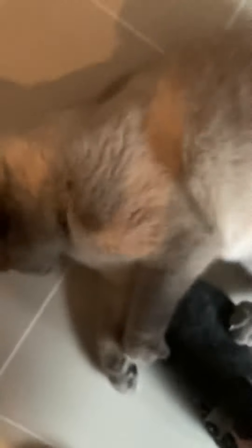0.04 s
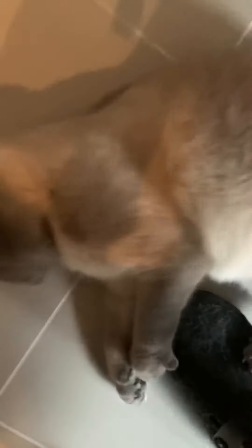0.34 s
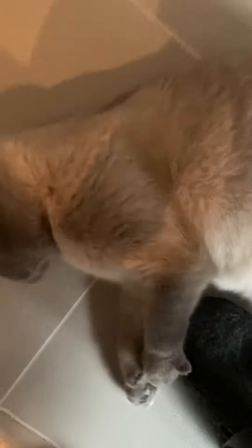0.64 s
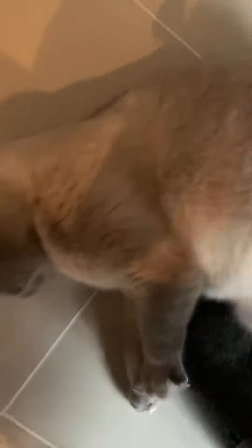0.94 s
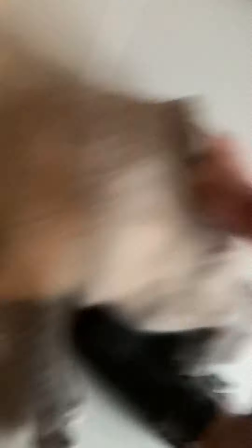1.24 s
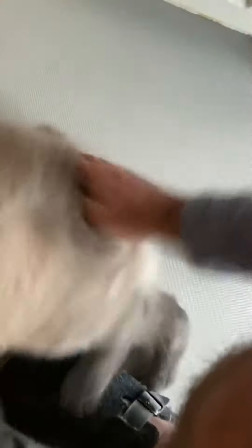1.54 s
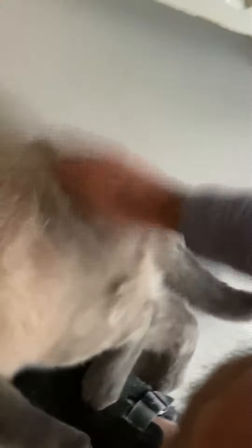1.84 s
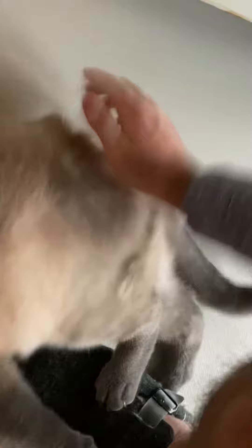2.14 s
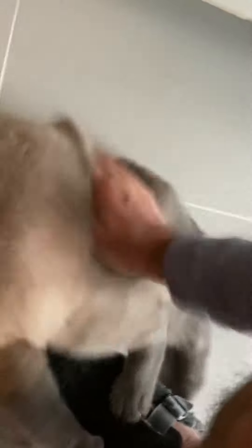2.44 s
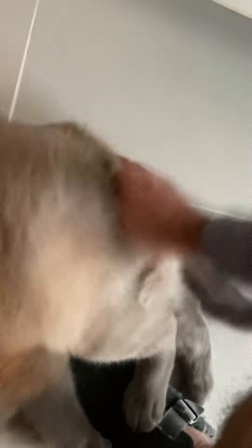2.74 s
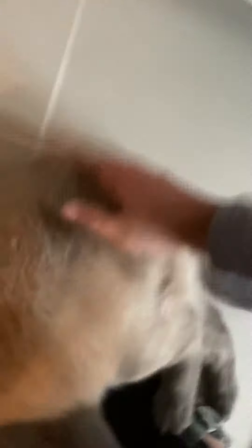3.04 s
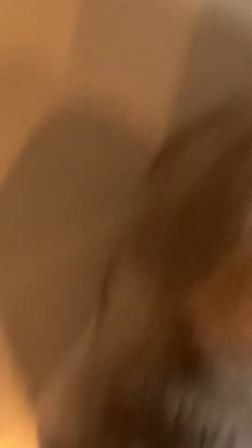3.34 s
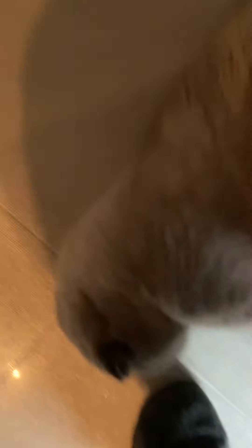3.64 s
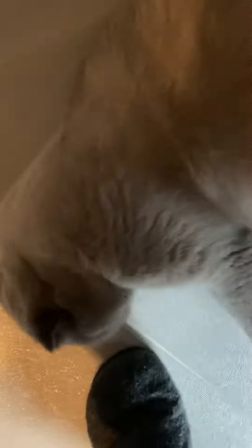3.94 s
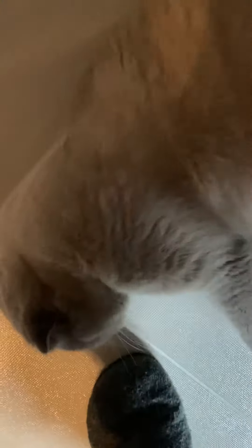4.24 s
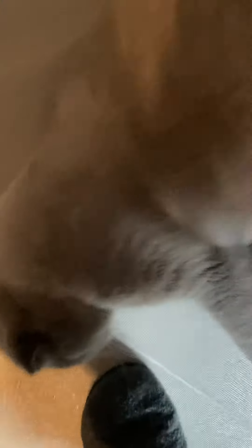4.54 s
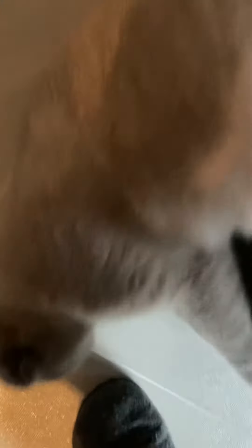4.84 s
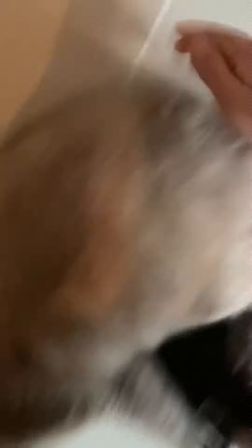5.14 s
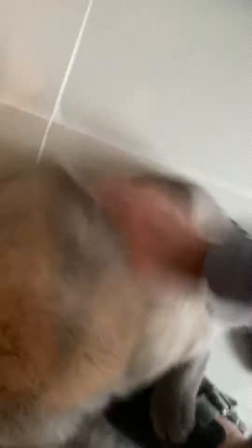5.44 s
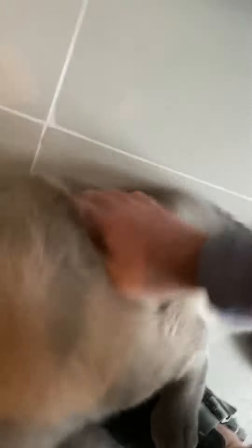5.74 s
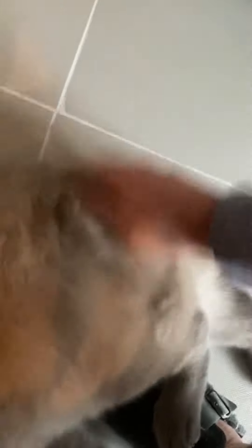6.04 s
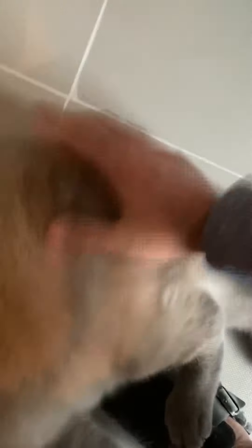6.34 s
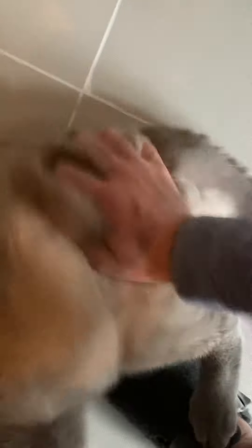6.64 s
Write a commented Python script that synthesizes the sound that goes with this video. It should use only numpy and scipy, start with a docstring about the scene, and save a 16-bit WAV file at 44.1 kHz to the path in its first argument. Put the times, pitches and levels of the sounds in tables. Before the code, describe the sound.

A hand pats a cat in two runs of soft, quick thumps, with fur rustling and a short low grumble between.

```python
"""Patting a cat on a tiled floor

A hand pats a cat's rump close by, about four times a second in two runs. Each pat brushes the fur,
claps the air out from under the palm and thumps the body; the bare room answers. Fur and sleeve
rustle in between, a few small things tick, and a short low grumble fills the pause."""
import sys
import numpy as np
from scipy import signal
from scipy.fft import rfft, irfft
from scipy.io import wavfile
from scipy.ndimage import uniform_filter1d

SR = 44100
rng = np.random.default_rng(int(sys.argv[2]) if len(sys.argv) > 2 else 0)


def file_out(sig):
    """Save sig as 16-bit WAV at sys.argv[1]."""
    # one column per channel
    cols = np.atleast_2d(sig).T
    # limit, then scale
    lim = np.clip(cols, -1, 1)
    pcm = np.round(lim * 32767).astype(np.int16)
    wavfile.write(sys.argv[1], SR, pcm)


N = 300144
TIME_S = np.arange(N) / SR

# pats: contact_s, thump_db, thud_db, clap_db, slap_db, crack_db, thud_hz, clap_hz, clap_width_hz
PATS = [(0.1349, -37, -38, -42, -62, -49.5, 342, 1160, 1080),
        (1.3934, -36.5, -38.5, -47, -54, -54, 306, 1410, 1000),
        (1.6332, -29.5, -41.5, -31, -68, -35, 440, 970, 880),
        (1.8675, -36, -37.5, -34, -50, -40.5, 298, 1670, 1090),
        (2.1016, -29, -26.5, -28, -55, -36, 350, 1470, 870),
        (2.337, -31.5, -32, -35, -75.5, -47.5, 265, 1300, 1160),
        (2.574, -27, -31, -38, -55, -44.5, 262, 1550, 1190),
        (2.8157, -29, -31.5, -28, -43.5, -38.5, 262, 1560, 800),
        (4.6545, -32.5, -37, -37, -54, -49, 277, 1013, 444),
        (4.8913, -30, -33.5, -37, -46.5, -46, 247, 800, 440),
        (5.1207, -33, -40, -35, -52, -48.5, 285, 1710, 980),
        (5.3519, -30.5, -29, -35.5, -51.5, -46.5, 392, 905, 714),
        (5.585, -35.5, -37.5, -36, -58, -43, 225, 1450, 503),
        (5.8136, -33.5, -38, -43, -56.5, -49, 339, 1350, 1080),
        (6.052, -39, -42, -41.5, -54, -60.5, 438, 1240, 1100),
        (6.4358, -55.5, -48, -52, -61.5, -56.5, 390, 890, 1000)]
# spectrum of skin cracks and dry snaps: freq_hz, gain_db
CRACK_SPECTRUM = [(2200, -22), (3300, -6), (5000, -4), (7500, 0), (10000, .5), (12000, -.5), (14500, -1),
                  (17000, -9)]


def pat(contact_s, thump_db, thud_db, clap_db, slap_db, crack_db, thud_hz, clap_hz, clap_width_hz):
    """Fur gives way, fingers slap, trapped air claps out, the palm thuds, the damped body swings."""
    fur_spectrum = [(60, -18), (200, 7.5), (700, -6.5), (1600, -1), (2800, -11), (6000, -26), (16000, -28)]  # brushed fur: freq_hz, gain_db
    slap_spectrum = [(800, -25), (2000, -3), (2700, 13.5), (3800, 1.5), (5000, -2), (6500, -30),
                     (12000, -26)]  # finger slap: freq_hz, gain_db
    body_hz, firm_db, stiffen_hz_per_db = 118.5, -30.5, 1.9
    t = np.arange(-2048, 4096) / SR
    hairs, skin, tips, air, flesh, uneven = rng.standard_normal((6, len(t)))
    slowness = amp(-0.3 * (clap_db + 33))  # a gentler hand sinks through the fur more slowly
    sinking = swell(t, 0.0031 * slowness, 0.002) + amp(-27) * swell(t, 0.012, 0.0028)
    fur = slowness * burst(colour(hairs, fur_spectrum) * sinking)
    patches = np.exp(0.5 * unit_rms(uniform_filter1d(uneven, size=12)))  # skin lands patch by patch
    landing = patches * swell(t - 0.0004, 0.0005, 0.002)
    slap = burst(colour(tips * landing, slap_spectrum))
    crack = burst(colour(skin * landing, CRACK_SPECTRUM))
    puff = air * swell(t - 0.0005, 0.0011, 0.0022)
    clap = burst(resonate_twice(puff, clap_hz, clap_width_hz, 2400))
    push = resonate_twice(flesh * swell(t - 0.003, 0.0012, 0.0055), thud_hz, 380, 400)
    thud = burst(burst(ring(t - 0.0022, thud_hz, 0.0039, 0.00058)) + 0.5 * burst(push))
    thump_hz = body_hz + stiffen_hz_per_db * (thump_db - firm_db)  # a harder pat stiffens the body
    overtone = ring(t - 0.0028, 1.496 * thump_hz, 0.006, 0.00063)
    thump = burst(ring(t - 0.0022, thump_hz, 0.0084, 0.0073) + 0.32 * overtone)
    highs = (fur * amp(clap_db - 6.5) + clap * amp(clap_db - 0.45)
             + slap * amp(slap_db) + crack * amp(crack_db - 0.9))
    return contact_s + t[0], highs + thud * amp(thud_db - 1.7) + thump * amp(thump_db - 3.5)


def bump(start_s, level_db, pitch_hz):
    """A paw or hand lands softly, without a smack."""
    t = np.arange(4096) / SR
    knock = ring(t, pitch_hz, 0.0063, 0.0016) + 0.31 * ring(t, 105, 0.016, 0.0008)
    return start_s, amp(level_db - 8.5) * burst(knock)


def stroke(peak_s, half_length_s, level_db, centre_hz, width_hz):
    """Hairs slip under the hand in a short swish."""
    n = int(half_length_s * 2 * SR)
    swish = resonate_twice(rng.standard_normal(n), centre_hz, width_hz, width_hz)
    return peak_s - half_length_s, amp(level_db + 5) * unit_rms(swish) * np.hanning(n) ** 2


def contacts():
    """Pats, bumps and strokes in mono, with fresh noise on each call."""
    bumps = [(0.488, -34, 360), (0.554, -45, 186), (1.177, -51.5, 76), (3.043, -48.5, 88.8),
             (3.512, -54, 174), (4.55, -49, 112), (6.293, -50, 72.7), (6.654, -57.5, 166)]  # paw and hand bumps: start_s, level_db, pitch_hz
    strokes = [(0.332, 0.059, -61, 1330, 1270), (0.334, 0.039, -69, 4620, 695),
               (0.862, .06, -76, 2570, 3000), (2.496, 0.027, -64.5, 7800, 7000),
               (2.975, 0.032, -66, 3100, 700), (3.107, 0.099, -66, 1370, 450),
               (3.117, 0.062, -61.5, 390, 147), (3.244, 0.042, -65, 1970, 2750),
               (3.392, .04, -59, 1850, 393), (3.516, 0.046, -59, 1850, 1220), (3.693, .08, -54, 1740, 2120),
               (4.049, .16, -75, 4340, 1000), (6.236, 0.15, -65.5, 1500, 1440)]  # fur strokes: peak_s, half_length_s, level_db, centre_hz, width_hz
    return play(pat, PATS) + play(bump, bumps) + play(stroke, strokes)


def grumble(pulse_hz=85, jitter=0.39, uneven_db=3, rasp=0.46):
    """Irregular pulses ring the chest; a broad mouth resonance drifts over narrow nasal ones."""
    contour = [(3.62, -71, -59, 1090), (3.728, -42, -59.5, 890), (3.76, -45, -67, 860),
               (3.8, -38, -51.5, 850), (3.976, -50.5, -55.5, 1087), (4.032, -56, -71, 920),
               (4.14, -69.5, -88.5, 1100), (4.16, -74, -93, 978)]  # course of the grumble: time_s, chest_db, mouth_db, mouth_hz
    chest_modes = [(114.7, 22.6, -2.5), (205, 76, -6), (273, 74, -1), (319, 34, -2.5)]  # low resonances: centre_hz, width_hz, gain_db
    nasal_modes = [(624, 16, 0), (799, 28, 9), (897, 71, 1.5), (1203, 55, 7)]  # upper resonances: centre_hz, width_hz, gain_db
    times_s, *columns = np.transpose(contour)
    t = np.arange(times_s[0], times_s[-1], 1 / SR)
    chest_db, mouth_db, mouth_hz = (np.interp(t, times_s, column) for column in columns)
    rate_hz = pulse_hz * np.exp(jitter * wander(len(t), 400))
    cycles = np.floor(np.cumsum(rate_hz) / SR)
    pulses = np.diff(cycles, prepend=0) * amp(uneven_db * rng.standard_normal(len(t)))
    drive = unit_rms(pulses) + rasp * rng.standard_normal(len(t))
    chest = resonator_bank(drive, chest_modes)
    mouth = resonate(resonator_bank(drive, nasal_modes), mouth_hz, width_hz=270)
    voice = amp(chest_db + 1) * unit_rms(chest) + amp(mouth_db - 1) * unit_rms(mouth)
    return times_s[0], voice * signal.windows.tukey(len(t), 0.1)


def tick(contact_s, snap_db, ring_db, ring_hz):
    """A dry snap with a very short ring and one overtone."""
    t = np.arange(-256, 2048) / SR
    snap = colour(rng.standard_normal(len(t)) * swell(t - 0.0002, 0.00057, 0.0051), CRACK_SPECTRUM)
    overtone = amp(-1.5) * ring(t, 1.87 * ring_hz, 0.00051, 0.00017)
    knock = ring(t + 0.00083, ring_hz, 0.0014, 0.00086) + overtone
    return contact_s + t[0], amp(snap_db) * burst(snap) + amp(ring_db) * burst(knock)


def sleeve(start_s, length_s, level_db, weave_hz=4700, width_hz=1300, whistle_hz=5950):
    """Ribbed cloth slides over itself; pitch and level follow the arm's speed."""
    speed = np.sin(np.linspace(0, np.pi, int(length_s * SR)))
    glide = 1 - 0.13 * (1 - speed)
    weave_noise, whistle_noise = rng.standard_normal((2, len(speed)))
    weave = resonate_twice(weave_noise, weave_hz * glide, width_hz, 2 * width_hz)
    whistle = resonate(whistle_noise, whistle_hz * glide, width_hz=120)
    return start_s, amp(level_db) * speed * (unit_rms(weave) + amp(-8) * unit_rms(whistle))


def friction(grain_db=1.25):
    """Fur and cloth rub in uneven clumps, easing as the hand hovers before a pat and lifts after it."""
    contour = [(0.0, -52.5, -68.5, -84.5), (0.4, -53, -61.5, -79), (0.68, -75.5, -80, -86),
               (1.23, -67, -71.5, -87), (1.61, -58.5, -59.5, -75.5), (2.1, -56.5, -64.5, -84.5),
               (2.9, -57, -52.5, -66.5), (3.52, -61.5, -66, -83.5), (3.73, -60, -56, -81),
               (3.86, -56, -60.5, -83), (4.13, -76, -75, -88.5), (4.49, -68.5, -75.5, -92.5),
               (4.81, -54.5, -61, -89.5), (5.11, -66, -68, -77), (5.45, -58, -71, -102),
               (6.42, -58, -59.5, -75.5), (6.63, -59.5, -67.5, -75.5), (6.8, -69.5, -85, -90.5)]  # friction levels: time_s, shuffle_db, rustle_db, hiss_db
    shuffle_spectrum = [(20, -11.5), (50, 0.5), (120, 3), (220, -4.5), (380, -0.5), (600, -14), (1200, -25),
                        (4000, -56)]  # low band: freq_hz, gain_db
    rustle_spectrum = [(200, -32.5), (700, -1), (1200, 2.5), (1800, 7.5), (2600, -1.5), (4400, -8),
                       (6000, -17), (12000, -31.5)]  # middle band: freq_hz, gain_db
    hiss_spectrum = [(2500, -25), (5600, -8), (7500, 6), (10000, 6), (12000, -20), (14500, -0.5),
                     (17000, -11.5)]  # high band: freq_hz, gain_db
    times_s, *columns = np.transpose(contour)
    shuffle_db, rustle_db, hiss_db = (np.interp(TIME_S, times_s, column) for column in columns)
    hover = pat_humps(lag_s=-0.084, width_s=0.044)
    lift = pat_humps(lag_s=0.06, width_s=0.075)
    clumps = amp(grain_db * wander(N, 120))

    def band(spectrum, level_db, hover_db, lift_db):
        rubbing = unit_rms(colour(patchy(diffuse_noise()), spectrum) * clumps)
        return rubbing * amp(level_db + hover_db * hover + lift_db * lift)

    return (band(shuffle_spectrum, shuffle_db - 1, hover_db=-2, lift_db=-2.5)
            + band(rustle_spectrum, rustle_db - 2, hover_db=-2.1, lift_db=-5)
            + band(hiss_spectrum, hiss_db + 1.9, hover_db=-2.5, lift_db=-4.5))


def pat_humps(lag_s, width_s):
    """A smooth hump of height one at a set lag from every pat."""
    return sum(np.exp(-((TIME_S - contact_s - lag_s) / width_s) ** 2) for contact_s, *_ in PATS)


def patchy(x, patch_db=3, surge_db=1):
    """Friction catches in passing patches of pitch and surges as a whole."""
    spectra = signal.stft(x, SR, nperseg=512)[2]
    _, bins, frames = spectra.shape
    patches = uniform_filter1d(rng.standard_normal((frames, bins)), size=9, axis=0)
    patches = uniform_filter1d(patches, size=4, axis=1)
    gain_db = patch_db * unit_rms(patches).T + surge_db * wander(frames, 6)
    return signal.istft(spectra * amp(gain_db), SR, nperseg=512)[1][:, :N]


def room(hand, close):
    """Three diffuse tails slowly crossfade, so each pat rings differently; the standing waves stay."""
    modes = [(122.7, -5.5, 0.42), (163.6, 9, 0.093), (212, -4.5, .35), (293, -3.5, 0.49),
             (467.6, 11.5, 0.34), (500, -12, 0.5), (554, -1, 0.5), (703, 1, 0.4), (976, 0, 0.35),
             (1227, -4, .35), (1417, 7.5, 0.2), (1500, -3.5, 0.32), (1880, 2, 0.13)]  # standing waves: freq_hz, gain_db, t60_s
    crossfade_hz, close_send_db = 0.6, -6
    reflections = np.zeros((2, N))
    for phase_rad in np.linspace(0, np.pi, num=3, endpoint=False):
        share = np.sqrt(2 / 3) * np.cos(2 * np.pi * crossfade_hz * TIME_S + phase_rad)
        send = share * (contacts() + amp(close_send_db) * close)
        reflections += signal.fftconvolve(send[None], room_tail(), axes=1)[:, :N]
    standing = sum(amp(gain_db) * resonate(hand, freq_hz, np.log(1000) / np.pi / t60_s)
                   for freq_hz, gain_db, t60_s in modes)
    return amp(2.5) * reflections + amp(-1) * standing


def room_tail(build_s=0.00057):
    """Dense reflections build up, then each band dies at its own rate."""
    decay_times = [(100, .42), (400, .45), (1000, .4), (2000, .39), (4000, .4), (8000, .37), (15000, .3)]  # reverberation: freq_hz, t60_s
    tail_spectrum = [(40, -15), (100, -11), (180, -3.5), (350, -5.5), (700, 0), (1050, -5), (1800, -7.5),
                     (3000, -7), (4200, -6.5), (6000, -9.5), (10000, -11), (15000, -12)]  # reflected sound: freq_hz, gain_db
    freq_hz, t, spectra = signal.stft(diffuse_noise()[:, :SR], SR, nperseg=512)
    t60_s = lookup(decay_times, freq_hz)[:, None]
    unit_energy = np.sqrt(2 * np.log(1000) / (t60_s * SR))
    gain_db = lookup(tail_spectrum, freq_hz)[:, None] - 60 * t / t60_s
    tail = signal.istft(spectra * unit_energy * amp(gain_db), SR, nperseg=512)[1][:, :SR]
    return tail * (1 - np.exp(-(TIME_S[:SR] / build_s) ** 2))


def still_air(level_db=-80):
    """The room's faint steady noise."""
    air_spectrum = [(20, -1.5), (50, 6), (150, -1), (400, -19.5), (800, -28), (2000, -23.5), (5000, -28.5),
                    (16000, -36)]  # room noise: freq_hz, gain_db
    return amp(level_db) * unit_rms(colour(diffuse_noise(), air_spectrum))


def diffuse_noise():
    """Stereo noise, alike in the bass and nearly unrelated in the treble."""
    likeness = [(100, 0.82), (280, 0.91), (560, 0.5), (1000, 0.2), (1700, 0), (2800, -.1), (7000, -.25),
                (11000, 0.09), (15000, 0.03)]  # diffuse sound between channels: freq_hz, correlation
    mid, side = rfft(rng.standard_normal((2, N)))
    correlation = lookup(likeness, np.fft.rfftfreq(N, 1 / SR))
    mid *= np.sqrt((1 + correlation) / 2)
    side *= np.sqrt((1 - correlation) / 2)
    return irfft(np.array([mid + side, mid - side]), N)


def mic_ports(x):
    """Direct sound reaches two microphone ports with a phase shift bent by the case."""
    port_phase = [(0, 0), (300, -.2), (1000, -.9), (2000, -1.65), (2900, -2.2), (3600, -4.6), (4200, -5.1),
                  (5500, -3.1), (8000, -.55), (9000, .3), (11500, 3), (13000, 4), (14700, 5.9)]  # left port's lead: freq_hz, phase_rad
    phase_rad = np.interp(np.fft.rfftfreq(N, 1 / SR), *np.transpose(port_phase))
    return np.array([irfft(rfft(x) * np.exp(1j * phase_rad), N), x])


def amp(db):
    """Decibels to gain."""
    return 10 ** (np.asarray(db) / 20)


def unit_rms(x):
    """Scales to an rms of one."""
    return x / np.sqrt(np.mean(x ** 2) + 1e-20)


def burst(x):
    """Scales to the energy of 30 ms at an rms of one."""
    return x / np.sqrt(np.sum(x ** 2) / (0.03 * SR) + 1e-20)


def wander(n, span):
    """Noise averaged over span points, at an rms of one."""
    return unit_rms(uniform_filter1d(rng.standard_normal(n), size=span))


def lookup(table, freq_hz):
    """Interpolates on a log-frequency axis."""
    knots_hz, values = np.transpose(table)
    return np.interp(np.log(freq_hz + 1), np.log(knots_hz + 1), values)


def colour(x, spectrum):
    """Filters by rows of freq_hz, gain_db."""
    n = x.shape[-1]
    return irfft(rfft(x) * amp(lookup(spectrum, np.fft.rfftfreq(n, 1 / SR))), n)


def resonate(x, centre_hz, width_hz):
    """A unity-gain resonance whose centre may glide."""
    carrier = np.exp(2j * np.pi * np.cumsum(centre_hz * np.ones(len(x))) / SR)
    pole = np.exp(-np.pi * width_hz / SR)
    return 2 * (carrier * signal.lfilter([1 - pole], [1, -pole], x / carrier + 1e-18)).real


def resonate_twice(x, centre_hz, first_width_hz, second_width_hz):
    """Two resonances in series, for steeper skirts."""
    return resonate(resonate(x, centre_hz, first_width_hz), centre_hz, second_width_hz)


def resonator_bank(x, modes):
    """Steep resonances in parallel."""
    return sum(amp(gain_db) * resonate_twice(x, centre_hz, width_hz, 2 * width_hz)
               for centre_hz, width_hz, gain_db in modes)


def swell(t, rise_s, fall_s):
    """Exponential rise to t = 0, then decay."""
    return np.exp(np.minimum(t, 0) / rise_s - np.maximum(t, 0) / fall_s)


def ring(t, pitch_hz, fall_s, rise_s):
    """A damped sine starting softly at t = 0."""
    t = np.maximum(t, 0)
    return np.sin(2 * np.pi * pitch_hz * t) * np.exp(-t / fall_s) * (1 - np.exp(-t / rise_s))


def add(mix, start_s, sound):
    """Mixes a sound in at start_s."""
    part = mix[max(round(start_s * SR), 0):][:len(sound)]
    part += sound[:len(part)]


def play(source, table):
    """Mixes one sound per table row."""
    mix = np.zeros(N)
    for row in table:
        add(mix, *source(*row))
    return mix


def scene():
    """Direct sound, room, friction and air; ticks, sleeve and grumble are drier than the pats."""
    ticks = [(0.456, -44.5, -38.5, 1826), (0.4732, -58, -43, 1670), (0.487, -65, -54, 1150),
             (0.5524, -72.5, -48.5, 676), (1.174, -95, -70, 1280), (1.331, -80, -61, 1080),
             (1.4921, -67, -56, 1180), (2.479, -64, -66, 790), (2.704, -59.5, -72, 1840),
             (3.038, -64.5, -55.5, 1310), (3.06, -66, -60, 1400), (3.367, -84, -64, 1840),
             (3.462, -69, -80, 816), (3.955, -74.5, -60, 1190)]  # small dry ticks: contact_s, snap_db, ring_db, ring_hz
    sleeve_swings = [(4.491, 0.16, -67), (4.68, 0.4, -68), (4.951, .18, -70)]  # swings on which the weave sings: start_s, length_s, level_db
    hand = contacts()
    close = play(tick, ticks) + play(sleeve, sleeve_swings)
    add(close, *grumble())
    return mic_ports(hand + close) + room(hand, close) + friction() + still_air()


def record(dry, cutoff_hz=16650):
    """The left port hears a little more bass; treble is lifted, deep rumble and the very top are cut."""
    left = colour(dry[0], [(100, 2.7), (350, 0.0), (900, 2.5), (2000, -2.0), (4000, 4.5)])
    right = colour(dry[1], [(100, 1.24), (350, -1.5), (900, 2), (2000, -1.0), (4000, 4.43)])
    stereo = colour(np.array([left, right]), [(20, -31.0), (32, -15.5), (48, 0.5), (65, -0.5)])
    lowpass = signal.firwin(511, cutoff_hz, window=("kaiser", 9), fs=SR)
    return signal.oaconvolve(stereo, lowpass[None], "same")


dry = scene()
out = record(dry)
file_out(out)
```